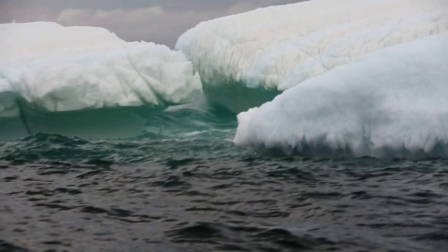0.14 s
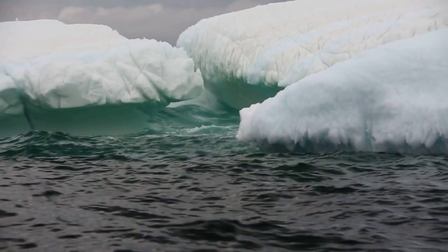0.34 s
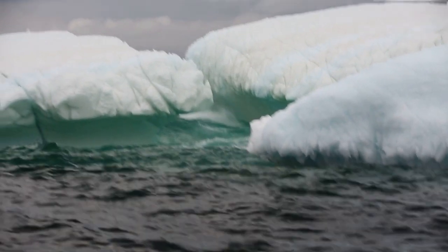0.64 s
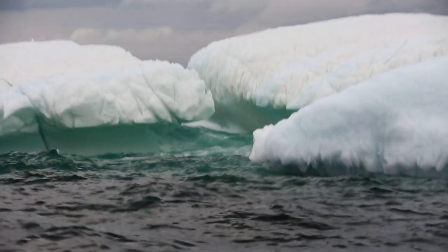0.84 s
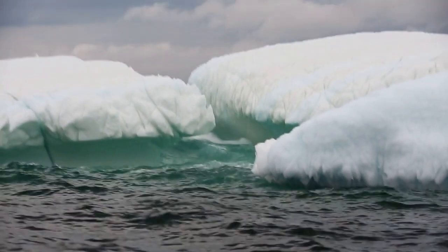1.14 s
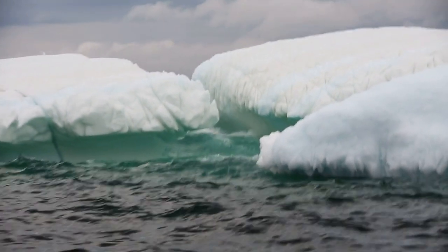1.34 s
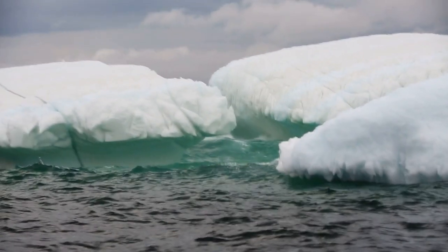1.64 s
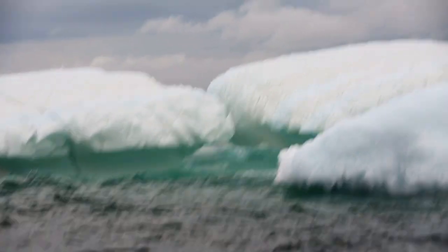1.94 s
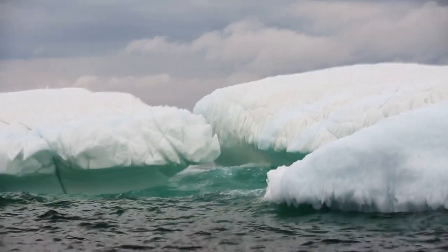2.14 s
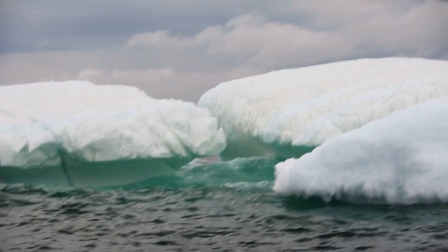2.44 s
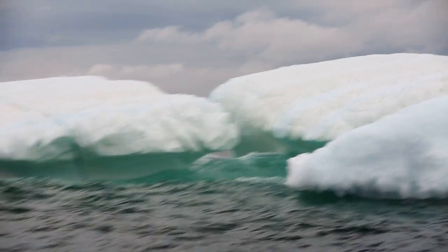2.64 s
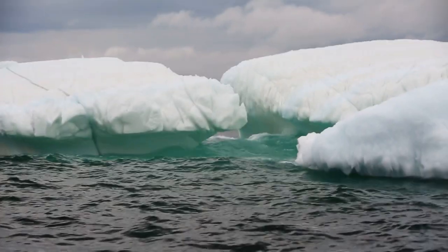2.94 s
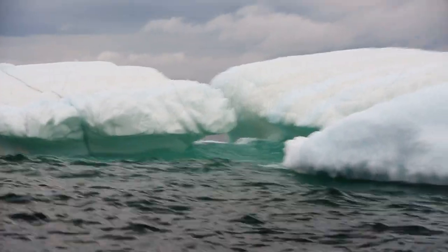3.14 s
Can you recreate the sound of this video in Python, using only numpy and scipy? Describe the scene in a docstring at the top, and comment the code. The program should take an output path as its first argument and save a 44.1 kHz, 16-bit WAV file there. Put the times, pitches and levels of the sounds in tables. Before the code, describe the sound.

Sea water washes and slops around floating ice, with wind thumping on the microphone

```python
"""Sea water washes around floating ice, heard from a small boat: noise and bubbles, foam fizz, low wind rumble.
A first flurry of ticks (melting ice or spray: tiny rings with cracks) leads to a chattering squeak of tones
and a few small knocks of damped modes on board, while wind thumps on the microphone as sagging low tones.
One broad surge of the wash follows, with a puff of splash and a second flurry; air gulps as wavering tones.
Later come slops, stray ticks and another small splash, and a strong gust arrives at the end."""
import sys
import numpy as np
from scipy import signal
from scipy.fft import rfft, irfft, next_fast_len
from scipy.io import wavfile
from scipy.ndimage import uniform_filter1d, map_coordinates

SR = 44100
rng = np.random.default_rng(int(sys.argv[2]) if len(sys.argv) > 2 else 0)


def file_out(sig):
    """Save sig as 16-bit WAV at sys.argv[1]."""
    # one column per channel
    cols = np.atleast_2d(sig).T
    # limit, then scale
    lim = np.clip(cols, -1, 1)
    pcm = np.round(lim * 32767).astype(np.int16)
    wavfile.write(sys.argv[1], SR, pcm)


N = 145530

# hissing spectrum shared by the fizz and the rub noise [f/Hz, relative level/dB]
FIZZ_SPECTRUM = [(1500, -22.5), (3500, 5), (6000, 2), (7500, -5), (9000, -9.5), (10500, -11.5),
                 (13000, -19)]


def amp(db):
    """Decibels to gain."""
    return 10 ** (np.asarray(db) / 20)


def unit(x):
    """Scaled to rms 1."""
    return x / np.sqrt(np.mean(x ** 2) + 1e-20)


def clock():
    """The time of each sample in seconds."""
    return np.arange(N) / SR


def curve(rows):
    """Straight lines through (t/s, value) points, one value per sample."""
    return np.interp(clock(), *np.transpose(rows))


def wobble(rate):
    """A smooth random curve, rate knots a second."""
    knots = rng.standard_normal(int(N * rate / SR) + 4)
    return map_coordinates(knots, [clock() * rate])


def coloured(x, points):
    """x filtered through a spectrum of (f/Hz, level/dB) points."""
    m = next_fast_len(N + 8192)
    hz, db = np.transpose(points)
    freqs = np.fft.rfftfreq(m, 1 / SR)
    gain = amp(np.interp(np.log(freqs + 1), np.log(hz + 1), db))
    return irfft(rfft(x, m) * gain, m)[:N]


def coloured_noise(points):
    """Steady noise of rms 1 with the given spectrum."""
    return unit(coloured(rng.standard_normal(N), points))


def rush(colour, patchy_db):
    """Coloured noise of rms 1 with patches of random gain in time and frequency."""
    z = signal.stft(rng.standard_normal(N), nperseg=512)[2]
    field = uniform_filter1d(rng.standard_normal(z.shape), size=5, axis=0)
    field = uniform_filter1d(field, size=9, axis=1)
    patchy = signal.istft(z * amp(patchy_db * unit(field)), nperseg=512)[1][:N]
    return unit(coloured(patchy, colour))


def swell(s, rise, fall):
    """A rounded rise to 1 at time s, then a fall that becomes exponential."""
    t = clock() - s
    return np.exp(np.where(t < 0, -.5 * (t / rise) ** 2, 1 - np.hypot(1, t / fall)))


def bubbles(per_s, hz, spread, cycles, size_db, glide, size):
    """A cloud of damped sines that rise in pitch, rms 1; each loses 60 dB in the given cycles."""
    u = rng.random((int(per_s * N / SR), 4))
    bell = np.sqrt(-2 * np.log(1 - u[:, 1])) * np.cos(2 * np.pi * u[:, 2])  # normal spread of sizes
    pitch = np.clip(hz * np.exp(spread * bell), 1, SR / 4)[:, None]
    turns = pitch * np.arange(size) / SR
    age = turns / cycles
    strength = amp(size_db * np.minimum(-np.log(1 - u[:, 3:]), 2 * np.e))
    envelope = strength * amp(-60 * age) * (1 - np.exp(-2 * turns))
    ring = envelope * np.sin(2 * np.pi * turns * (1 + glide * age / 2))
    at = (u[:, :1] * N).astype(int) + np.arange(size)
    return unit(np.bincount(at.ravel(), ring.ravel(), N)[:N])


def waver(s, hz, glide_per_s, wander):
    """An unsteady tone of rms 1 that glides through about hz at time s."""
    glide = np.clip(glide_per_s * (clock() - s), -.5, .5)
    pitch = hz * np.exp(glide + wander * wobble(90))
    return np.sqrt(2) * np.sin(2 * np.pi * np.cumsum(pitch) / SR)


def ringing(modes, t):
    """Damped modes, t seconds after they are set going."""
    return sum(amp(db - 60 * t / t60) * np.sin(2 * np.pi * hz * t) for hz, db, t60 in modes)


def wind():
    """Air turbulence rumbles on, buffets broadly, and thumps in low tones whose pitch sags as they pass."""
    # low rumble of wind and boat, before its random drift [t/s, level/dB]
    rumble_level = [(0, -28.5), (.34, -22), (.46, -26), (.7, -29.5), (.95, -25), (1.27, -22), (1.6, -23.5),
                    (1.85, -25.5), (2.3, -24.5), (2.6, -27), (2.8, -27.5), (3.05, -26.5), (3.15, -27),
                    (3.3, -16)]
    # spectrum of the rumble [f/Hz, relative level/dB]
    rumble_colour = [(12, -16), (25, -5), (40, 0.5), (70, 2), (120, -0.5), (170, -4), (240, -10),
                     (400, -30), (900, -55), (6000, -100)]
    # thumps on the microphone, level of the tone [peak t/s, level/dB, rise/s, fall/s, f/Hz]
    thumps = [(0.4, -18, 0.0064, 0.01, 135), (.574, -14, 0.0028, 0.0057, 194.7),
              (0.577, -12.5, 0.005, 0.024, 88), (0.647, -9, 0.015, 0.012, 67),
              (0.686, -11.5, 0.0089, 0.016, 62), (.787, -18.5, 0.041, 0.023, 52),
              (1.456, -11.5, 0.0076, 0.0071, 78), (1.531, -21, 0.026, 0.039, 69.9),
              (2.287, -19, .01, 0.024, 125.2), (2.915, -22, 0.03, 0.069, 50.95),
              (3.045, -27, 0.017, 0.018, 129.2), (3.296, -10, 0.019, .04, 64)]
    # broad buffets that come with the strongest gusts [peak t/s, level/dB, rise/s, fall/s]
    buffets = [(0.574, -18, 0.0047, 0.018), (3.293, -19, 0.0175, .04)]
    # spectrum of the buffets [f/Hz, relative level/dB]
    buffet_colour = [(30, -36), (90, -10), (170, 5), (290, 3), (450, -18.5), (900, -25.5), (2500, -58),
                     (9000, -100)]
    sag_per_s, wander, noise_db = 1.2, 0.0937, -12  # thump noise is relative to its tone

    out = amp(curve(rumble_level) + 0.47 * wobble(13)) * coloured_noise(rumble_colour)
    turbulence = amp(noise_db) * coloured_noise(rumble_colour)
    for s, db, rise, fall, hz in thumps:
        thump = waver(s, hz, -sag_per_s, wander) + turbulence
        out += amp(db) * swell(s, rise, fall) * thump
    gusts = sum(amp(db) * swell(s, rise, fall) for s, db, rise, fall in buffets)
    return out + gusts * coloured_noise(buffet_colour)


def squeak():
    """The grip slips in a short falling tone amid a faint climbing rub; close modes ring on."""
    # rub tone, level before its chatter [peak t/s, level/dB, rise/s, fall/s, f/Hz]
    rub_tone = (0.4, -45.5, 0.07, 0.0344, 3750)
    # modes left ringing by the slip [f/Hz, level/dB, t60/s]
    slip_modes = [(4797, -34, 0.13), (4900, -45, .12), (5100, -41, .1), (5230, -41, .025), (4260, -44, .04)]
    start_s, length_s, edge_s = .3405, 0.0132, 0.002
    slip_db, slip_hz, slip_glide_per_s, slip_wander = -31, 4940, -2, 0.0049
    chatter_per_s, slip_rough = 900, .4  # the grip chatters lightly in the slip, fully in the rub tone

    s, db, rise, fall, hz = rub_tone
    rub = amp(db) * swell(s, rise, fall) * waver(s, hz, glide_per_s=20, wander=.03)
    rub *= wobble(chatter_per_s)

    t = np.maximum(clock() - start_s, 0)
    middle = start_s + length_s / 2
    level = np.clip(t / edge_s, 0, 1) * np.exp(-np.maximum(t - length_s, 0) / edge_s)
    slip = amp(slip_db) * level * waver(middle, slip_hz, slip_glide_per_s, slip_wander)
    slip *= 1 + slip_rough * wobble(chatter_per_s)

    ring = ringing(slip_modes, np.maximum(clock() - middle, 0))
    friction = amp(-43.5) * swell(middle, rise=0.0098, fall=0.015) * coloured_noise(FIZZ_SPECTRUM)
    return rub + slip + ring + friction


def knocks():
    """Each contact on board gives a crack with a brief bright ring and sounds a hollow body."""
    # contacts, gains of the clack and of the hollow body [t/s, clack level/dB, body level/dB]
    contacts = [(.3262, -35, -49), (0.3674, -22.5, -27), (.3698, -23.5, -13.5), (0.393, -35, -44),
                (0.4444, -25, -26)]
    # spectrum of the crack [f/Hz, relative level/dB]
    crack_colour = [(300, 7), (850, 14.5), (1300, 0), (2200, 6.5), (3700, 4), (5000, -5), (8000, -13),
                    (11000, -27)]
    # bright ring of the contact [f/Hz, relative level/dB, t60/s]
    clack_modes = [(2140, -9.5, 0.032), (2480, -18, .03), (3413, -5.5, 0.017), (4150, -8.5, 0.017),
                   (5750, -18, 0.022)]
    # resonances of the hollow body [f/Hz, relative level/dB, t60/s]
    body_modes = [(225, 2.5, 0.044), (413, -11, 0.13), (584, -6.5, 0.066), (825, -11.5, 0.04)]
    crack_t60_s, rise_s = 0.022, 0.00076

    out, crack = np.zeros(N), coloured_noise(crack_colour)
    for s, db, body_db in contacts:
        t = np.maximum(clock() - s, 0)
        clack = amp(-0.5 - 60 * t / crack_t60_s) * crack + ringing(clack_modes, t)
        body = ringing(body_modes, t)
        out += (1 - np.exp(-t / rise_s)) * (amp(db) * clack + amp(body_db) * body)
    return out


def ticks():
    """Melting ice or spray pops sharply, each pop a brief ring with a noisy crack in it."""
    # pops, level at the start of the ring [t/s, level/dB, f/Hz, t60/s]
    pops = [(0.051, -35, 7000, 0.0018), (.0744, -30, 7200, 0.0021), (0.1052, -31, 6300, 0.0028),
            (.133, -34, 7800, 0.0022), (0.139, -36, 7500, 0.0027), (.165, -40, 7300, 0.0059),
            (.226, -33.5, 7600, .002), (0.2337, -33, 7000, .0025), (.3275, -38, 8300, .007),
            (0.678, -29.5, 7360, 0.0014), (.953, -43, 7400, .005), (1.167, -33, 7000, 0.0022),
            (1.356, -42, 8200, .002), (1.3688, -25.5, 6700, 0.002), (1.372, -28, 7360, 0.002),
            (1.394, -39, 7000, 0.0024), (1.4145, -42, 8200, .002), (1.4172, -33, 6800, .0025),
            (1.4367, -34, 5160, 0.004), (1.438, -30, 4100, 0.016), (1.636, -38, 7960, .002),
            (1.8715, -35.5, 4360, 0.014), (2.307, -36.5, 4600, .005), (2.4435, -30.5, 4170, 0.0063),
            (2.458, -39, 5500, .004), (2.607, -38, 7500, 0.0017), (2.855, -42, 3700, .008)]
    # spectrum of the crack [f/Hz, relative level/dB]
    crack_colour = [(1000, -29), (3000, -4.5), (4500, 5), (7000, -5), (10000, -18), (14000, -8)]

    out, t = np.zeros(N + SR), np.arange(2048) / SR
    cracks = 0.52 * coloured_noise(crack_colour)
    for s, db, hz, t60 in pops:
        start = round(s * SR)
        pop = np.sin(2 * np.pi * hz * t) + cracks[start:][:len(t)]
        out[start:][:len(t)] += amp(db - 60 * t / t60) * pop
    return out[:N]


def splashes():
    """Wavelets break in short puffs of spray noise."""
    # little splashes [peak t/s, level/dB, rise/s, fall/s]
    puffs = [(1.265, -29.5, 0.0074, 0.0084), (2.544, -31, 0.005, 0.006)]
    # spectrum of the spray [f/Hz, relative level/dB]
    spray_colour = [(400, 2.5), (1250, -4), (1800, -13.5), (2600, -12), (5000, -23.5), (10000, -54)]

    spray = coloured_noise(spray_colour)
    return spray * sum(amp(db) * swell(s, rise, fall) for s, db, rise, fall in puffs)


def fizz():
    """Foam bursts in a fine crackle of tiny bubbles over a hiss."""
    # fizz of the foam [t/s, level/dB]
    fizz_level = [(0, -56.5), (.15, -52), (.3, -57), (.8, -60.5), (1.1, -63), (1.35, -54.5), (1.6, -58),
                  (2.2, -53), (2.7, -56), (3, -54), (3.28, -51)]

    crackle = bubbles(per_s=380, hz=6100, spread=.25, cycles=7.6, size_db=3.5, glide=0.12, size=160)
    hiss = rush(FIZZ_SPECTRUM, patchy_db=1.2)
    return amp(curve(fizz_level)) * unit(hiss + amp(-5.5) * crackle)


def gulps():
    """Pockets of trapped air ring roughly under the slop, rising in pitch."""
    # gulps of air, level before the roughness [peak t/s, level/dB, rise/s, fall/s, f/Hz]
    pockets = [(.561, -24.5, 0.0095, 0.012, 395), (1.084, -28, 0.027, 0.018, 386.4),
               (1.995, -25, 0.0057, 0.015, 390), (2.06, -31, 0.0064, 0.011, 691)]

    rings = np.zeros(N)
    for s, db, rise, fall, hz in pockets:
        rings += amp(db) * swell(s, rise, fall) * waver(s, hz, glide_per_s=0.36, wander=0.0504)
    return rings * unit(1 + 0.41 * wobble(200))


def slosh():
    """Nearby water slops as patchy low noise and gurgles with big bubbles."""
    # water slopping nearby, before its random drift [t/s, level/dB]
    slosh_level = [(0, -33), (.3, -33.5), (.46, -33), (.54, -27.5), (.7, -33), (.9, -33), (1.1, -31),
                   (1.5, -28), (1.65, -34), (1.9, -32), (2.05, -28.5), (2.22, -30.5), (2.45, -32.5),
                   (2.65, -35), (3.1, -33.5), (3.28, -29.5)]
    # spectrum of the slop [f/Hz, relative level/dB]
    slosh_colour = [(90, -27), (220, -1), (380, -0.5), (520, -2), (750, -8), (1100, -17), (2500, -50.5)]

    gurgle = bubbles(per_s=150, hz=432.0, spread=0.39, cycles=19.8, size_db=0.5, glide=0.1, size=4000)
    body = rush(slosh_colour, patchy_db=1.4) + amp(-3.0) * unit(coloured(gurgle, slosh_colour))
    return amp(curve(slosh_level) + .5 * wobble(24)) * unit(body)


def wash():
    """Water rushes on the ice: foam noise and many small bubbles swell together."""
    # strength of the wash on the ice, before its random drift [t/s, level/dB]
    wash_level = [(0, -41), (.25, -42), (.5, -40), (.72, -41), (.92, -38), (1.2, -36.5), (1.33, -35),
                  (1.55, -35.5), (1.8, -38.5), (2.2, -39), (2.5, -40.5), (2.8, -42), (3.1, -40.5),
                  (3.28, -38.5)]
    # spectrum of the wash [f/Hz, relative level/dB]
    wash_colour = [(250, -34), (600, 2.5), (1000, 1.5), (1500, 1), (2200, -3), (3500, -8.5), (5000, -18.5),
                   (8000, -31.5), (11000, -58)]

    grains = bubbles(per_s=900, hz=1720, spread=0.573, cycles=16.6, size_db=2.5, glide=0.39, size=900)
    body = rush(wash_colour, patchy_db=0.92) + amp(-10.0) * unit(coloured(grains, wash_colour))
    return amp(curve(wash_level) + 0.49 * wobble(13)) * unit(body)


def scene():
    """All layers add up over open water, with no echo."""
    on_board = wind() + squeak() + knocks()
    water = ticks() + splashes() + fizz() + gulps() + slosh() + wash()
    return (on_board + water)[None]


def record(dry):
    """The microphone dulls the highest treble and keeps nothing above its band limit."""
    # treble response of the microphone [f/Hz, gain/dB]
    treble_response = [(9000, -1), (10000, -8), (10800, -22.5), (12500, -16.5), (13800, -33)]
    top_hz = 13800

    m = next_fast_len(N + 8192)
    in_band = np.fft.rfftfreq(m, 1 / SR) < top_hz
    spectrum = rfft(coloured(dry[0], treble_response), m) * in_band
    return irfft(spectrum, m)[None, :N]


dry = scene()
out = record(dry)
file_out(out)
```